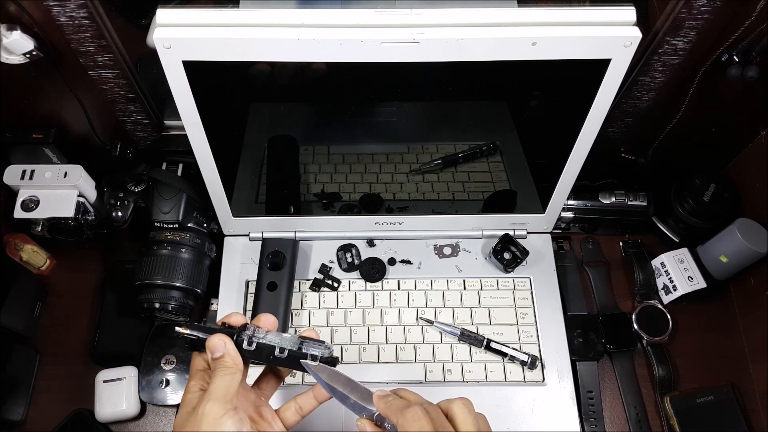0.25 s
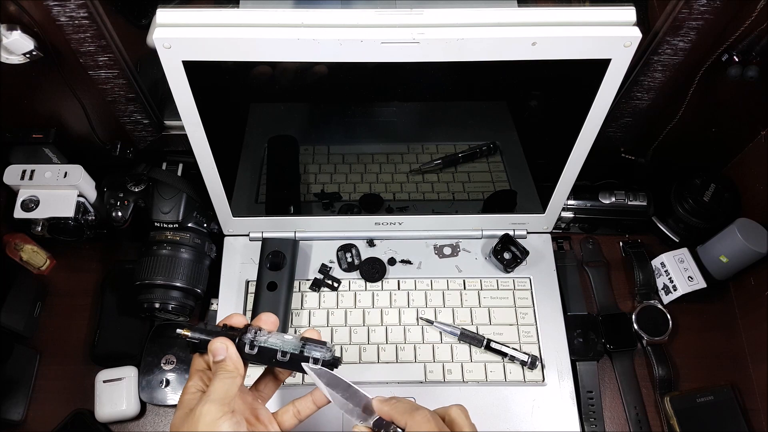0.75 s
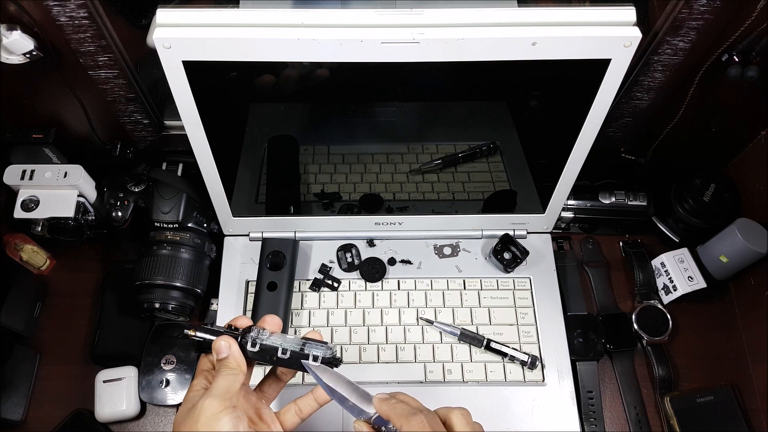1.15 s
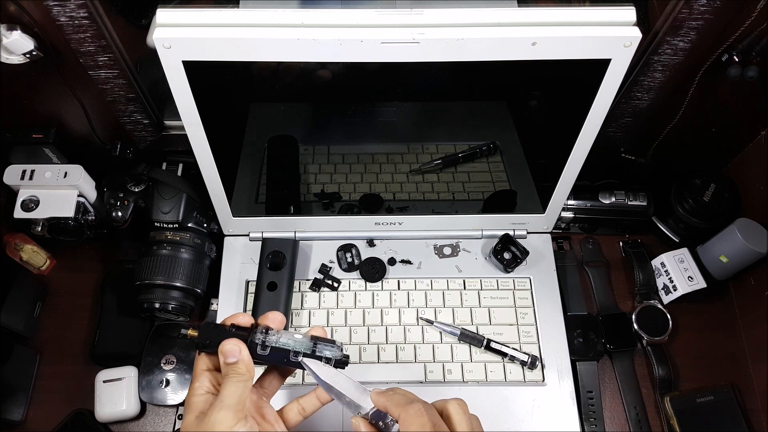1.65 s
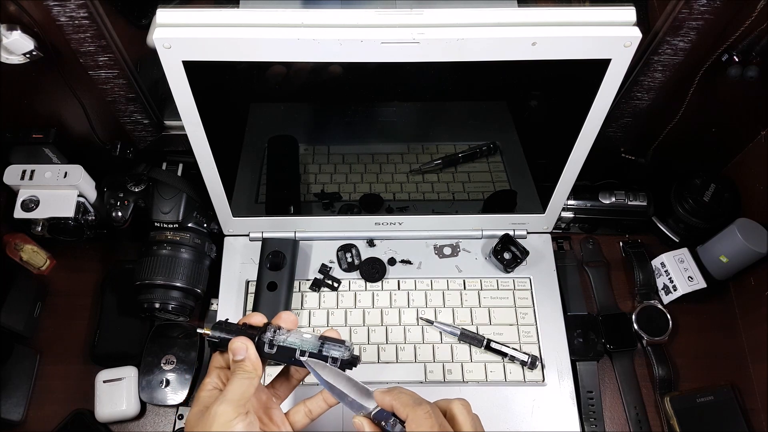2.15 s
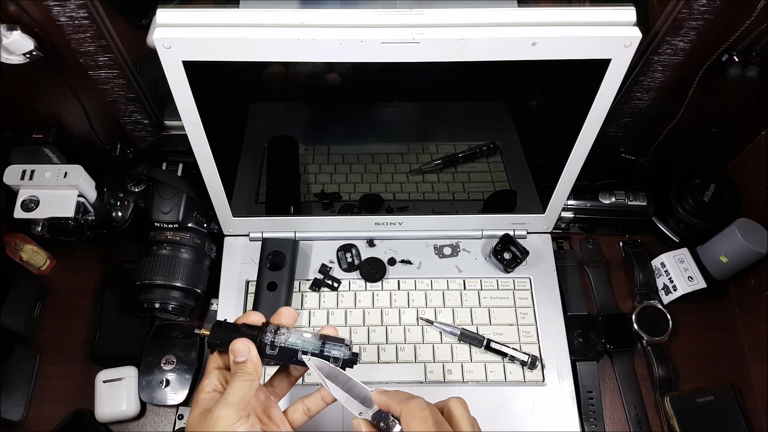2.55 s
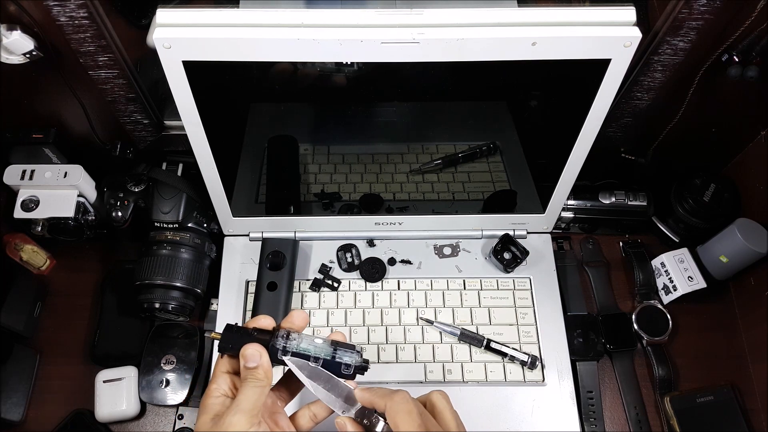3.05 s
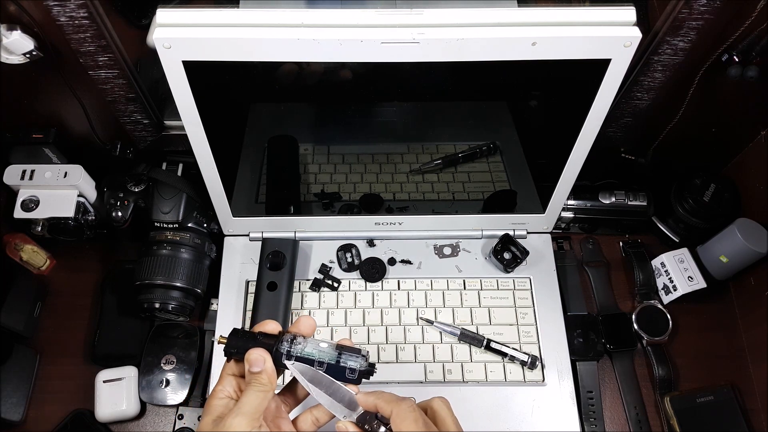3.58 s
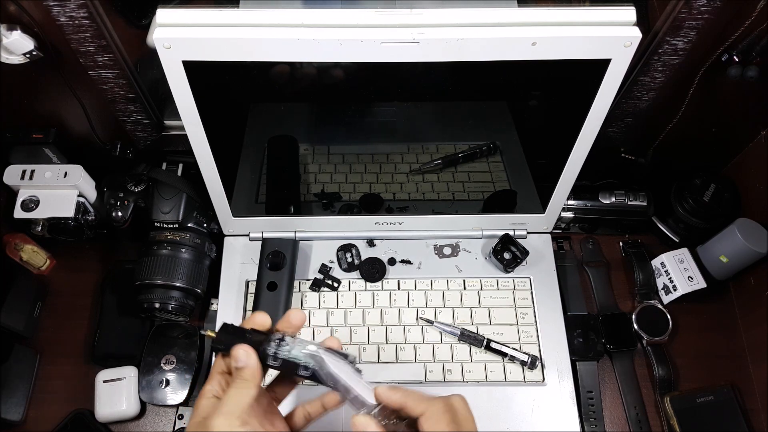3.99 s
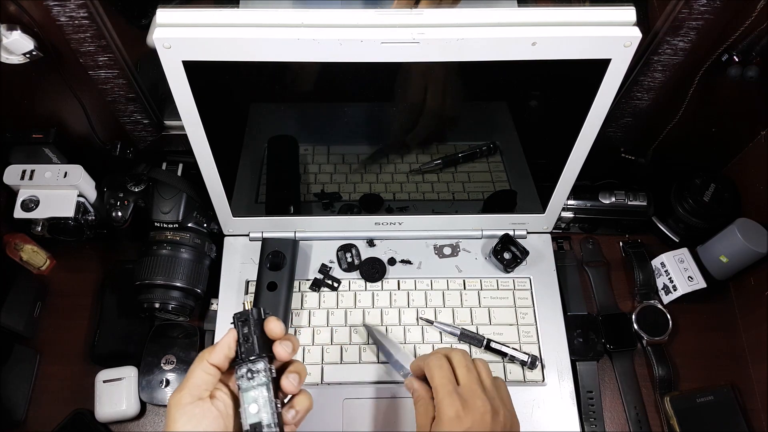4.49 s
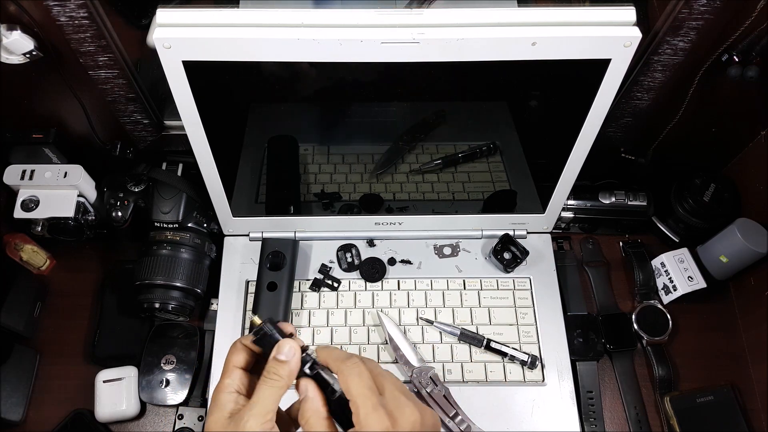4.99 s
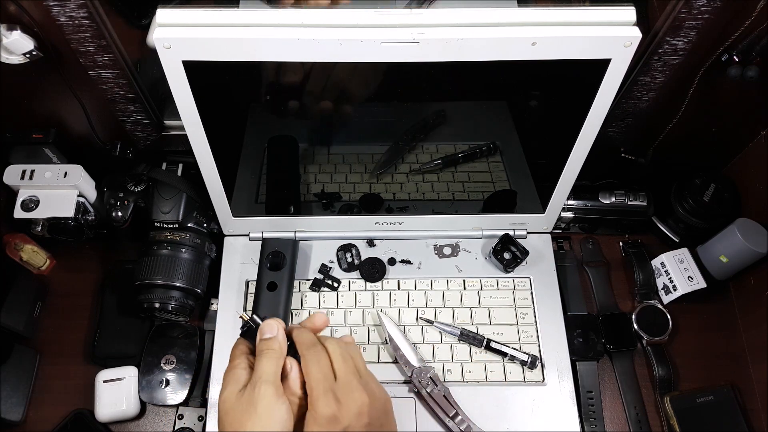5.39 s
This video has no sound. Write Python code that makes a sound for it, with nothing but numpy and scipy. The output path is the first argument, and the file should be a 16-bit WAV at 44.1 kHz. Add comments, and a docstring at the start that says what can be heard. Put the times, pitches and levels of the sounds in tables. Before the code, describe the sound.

A close, dry stereo desk recording of about 5.6 seconds. Soft air, low rumble, mains hum and a faint high motor whine with fine buzz run throughout. At 0.4 s a hard, bright plastic snap cracks out with a brief thump on the left; the recorder's gain dips and creeps back. Small dull picks and short stuttering scrapes follow at 0.6, 0.8, 1.6, 1.9 and a brighter one at 2.2 s. Around 2.65-2.9 s the tip slips and a tight part rings, strongest at 2.8. A tick at 3.2 leads to a tight cluster of snaps near 3.75 s. Fingers rub plastic around 4.0-4.4 s as the trimmer is turned and the air and buzz rise slightly. From 4.45 to 4.65 s the metal tool clatters onto the hollow laptop, hardest at 4.55, with quick bounces. Faint ticks follow, then plastic shells clack at 5.5 and more weakly at 5.6 s.

```python
"""Picking at a trimmer with a steel tool

A pointed tool picks and pries at plastic parts: small ticks, ringing slips and two hard snaps, the first with
a thump on the left microphone. The tool is laid down on a laptop, then plastic parts clack together. Noise
bursts ring the parts, decaying sines ring the laptop, and shaft-locked tones and a repeating scratch make a
small motor whine faintly in a dry room with air, rumble and hum. Loud blows, such as the first snap, make the
recorder turn its gain down; it holds, then creeps back."""
import sys
import numpy as np
from scipy import signal
from scipy.fft import rfft, irfft, next_fast_len
from scipy.io import wavfile
from scipy.ndimage import uniform_filter1d, minimum_filter1d, map_coordinates

SR = 44100
rng = np.random.default_rng(int(sys.argv[2]) if len(sys.argv) > 2 else 0)


def to_wav(sig):
    """Store sig (one row per channel, or 1-D mono) as 16-bit WAV at the path in sys.argv[1].

    Samples outside -1..1 are clipped; the rate is SR.
    """
    pcm = np.clip(np.atleast_2d(sig), -1, 1) * 32767
    pcm = np.round(pcm).astype(np.int16)
    wavfile.write(sys.argv[1], SR, pcm.T)  # frames by channels


N = 248283  # length in samples


def amp(db):
    """Decibels to gain."""
    return 10 ** (np.asarray(db) / 20)


def unit(x):
    """Scale to rms 1."""
    return x / np.sqrt(np.mean(x ** 2) + 1e-20)


def along(points, hz):
    """Read (f/Hz, value) points on a log frequency axis."""
    f, v = np.transpose(points)
    return np.interp(np.log(hz + 1), np.log(f + 1), v)


def curves(rows):
    """Automation: one value per sample for each column after the time."""
    s, *columns = np.transpose(rows)
    return [np.interp(np.arange(N) / SR, s, column) for column in columns]


def wobble(rate):
    """A smooth random curve with this many knots a second."""
    knots = rng.standard_normal(int(N * rate / SR) + 4)
    return map_coordinates(knots, [np.arange(N) * rate / SR])


def filtered(x, response):
    """Filter x with a function of frequency."""
    n = x.shape[-1]
    padded = next_fast_len(n + 8192)
    spectrum = rfft(x, padded) * response(np.fft.rfftfreq(padded, 1 / SR))
    return irfft(spectrum, padded)[..., :n]


def coloured(x, spectrum):
    """x shaped by a spectrum, at rms 1."""
    return unit(filtered(x, lambda hz: amp(along(spectrum, hz))))


def causal(gain):
    """The minimum-phase response with this gain: it rings only after the blow."""
    cepstrum = irfft(np.log(np.maximum(gain, 1e-6)))
    half = len(cepstrum) // 2
    return np.exp(rfft(np.r_[cepstrum[0], 2 * cepstrum[1:half]], len(cepstrum)))


def stereo_noise(size):
    """White noise at two microphones, alike in the bass and unrelated in the treble."""
    # left-right likeness: f/Hz, correlation (0 to 1)
    likeness = [(100, 0.97), (350, 0.45), (800, 0), (1600, 0.11), (16000, 0)]

    def mid_side(hz):
        turn = np.arccos(np.clip(along(likeness, hz), -1, 1)) / 2
        return np.array([np.cos(turn), np.sin(turn)])

    mid, side = filtered(rng.standard_normal((2, size)), mid_side)
    return np.array([mid + side, mid - side])


def add(track, s, sound):
    """Mix a sound into the track at s seconds."""
    part = track[..., round(s * SR):][..., :sound.shape[-1]]
    part += sound[..., :part.shape[-1]]


def burst(envelope):
    """Stereo noise under an envelope, with energy 1 in each channel."""
    x = stereo_noise(size=len(envelope)) * envelope
    return x / np.linalg.norm(x, axis=1, keepdims=True)


def room_tail(t, build_s):
    """The room's answer to one click, scaled to energy 1: each frequency dies at its own speed."""
    # decay of the dry room: f/Hz, t60/s
    decay = [(200, 0.3), (1000, 0.3), (3000, .27), (7000, 0.27), (15000, 0.21)]
    hz, when, z = signal.stft(stereo_noise(size=len(t)), SR, nperseg=256)
    fading = z * amp(-60 * when / along(decay, hz)[:, None])
    tail = signal.istft(fading, SR, nperseg=256)[1][:, :len(t)]
    return unit(tail * (1 - np.exp(-t / build_s))) / np.sqrt(len(t))


def turned(start_s=3.7, length_s=.55):
    """How far the hands have turned the trimmer round, 0 to 1."""
    return np.clip((np.arange(N) / SR - start_s) / length_s, 0, 1)


def background(rumble_db=1, air_db=-63.0, turned_db=2.0, mains_hz=49, mains_db=-6):
    """A soft rush of air, a little louder once the trimmer is turned, over low room rumble and mains hum."""
    # noise colours: f/Hz, relative level/dB per Hz
    rumble_colour = [(15, -34.5), (28, -15.5), (50, 1), (70, -5.5), (102, 1), (145, -3), (197, -18.5),
                     (280, -10), (400, -33), (800, -73.5)]
    air_colour = [(200, -8.5), (290, -1), (400, 1), (700, -3), (1250, -2), (1630, 3.5), (2050, -2.5),
                  (2500, -7.5), (3000, -4.5), (3700, -11.5), (6000, -19), (9500, -15.5), (13000, -12),
                  (16000, -9)]
    # fader for rumble and hum together: t/s, level/dB
    low_fader = [(0, -63), (.55, -61.5), (1.3, -77), (2.45, -75), (2.95, -64), (4.6, -61), (5.3, -63)]

    low_db, = curves(low_fader)
    mains = amp(mains_db) * np.sin(2 * np.pi * mains_hz * np.arange(N) / SR)
    rumble = amp(rumble_db + 0.27 * wobble(34)) * coloured(stereo_noise(size=N), rumble_colour)
    air = coloured(stereo_noise(size=N), air_colour)
    air_level = amp(air_db + turned_db * turned() + 0.4 * wobble(9.9))
    return amp(low_db) * (rumble + mains) + air_level * air


def motor(side_db=-75.0, turned_db=8, buzz_db=-67.5, held_waver=.00008, turned_waver=0.00036, order=27, size=2048):
    """Blade tones on the shaft's multiples, and a fine buzz from the same scratch repeating on every turn."""
    # main whine as the trimmer tilts: t/s, level/dB, left-right/dB
    whine_fader = [(0, -63.5, 8.5), (1.3, -66, 6), (2.6, -69.5, -3.5), (3.4, -69, -7), (4.15, -68.5, -7),
                   (4.7, -61, -7), (5.1, -68, -7), (5.5, -80.5, 4)]
    # quieter tones: shaft order, relative level/dB
    side_tones = [(15, 4.5), (18, -1.5), (21, -1), (23, -6), (24, -1), (29, -13), (31, -7), (33, -11)]
    # buzz colour: f/Hz, relative level/dB per Hz
    buzz_colour = [(2300, -43), (3000, -4), (5000, -9.5), (8000, -14), (10000, -14.5), (12000, -1),
                   (15000, 2.5), (16000, -1.5)]
    start_hz, drift_hz_per_s, sag_hz = 107.7, 0.044, 0.26  # slows a little, and again when turned
    whine_lag, side_lag = .43, .13  # lag at the right microphone (cycles)

    whine_db, left_db = curves(whine_fader)
    shaft_hz = start_hz - drift_hz_per_s * np.arange(N) / SR - sag_hz * turned()
    waver = (held_waver + turned_waver * turned()) * wobble(9.2)
    turns = np.cumsum(shaft_hz * (1 + waver)) / SR

    def tone(k, lag):
        # each microphone's level wavers separately as the hands move
        level = amp(1.5 * np.array([wobble(3.5), wobble(2.4)]))
        cycles = k * turns + rng.random() - np.array([[0], [lag]])
        return level * np.sin(2 * np.pi * cycles)

    one_turn = signal.resample(rng.standard_normal((2, size // 6)), size, axis=1)
    scratch = np.array([np.interp(turns % 1 * size, np.arange(size), channel) for channel in one_turn])
    whine = amp(whine_db + left_db * np.array([[.5], [-.5]])) * unit(tone(order, whine_lag))
    side = unit(sum(amp(db) * tone(k, side_lag) for k, db in side_tones))
    return whine + amp(side_db + turned_db * turned()) * side + amp(buzz_db) * coloured(scratch, buzz_colour)


def rubs():
    """Fingers shift on plastic: skin slides in short, uneven swells."""
    # slides: t/s, length/s, level/dB
    slides = [(2.512, 0.082, -66.5), (3.993, 0.1, -65), (4.22, 0.093, -65), (4.301, 0.15, -56),
              (5.222, 0.056, -63), (5.277, 0.082, -62)]
    # skin noise colour: f/Hz, relative level/dB per Hz
    skin_colour = [(500, -26), (1500, -11), (2300, -3), (3000, 7), (3700, -7.5), (5000, -11), (8000, -26),
                   (16000, -20)]
    t = np.arange(N) / SR
    swell = sum(amp(db) * np.sin(np.pi * np.clip((t - s) / length, 0, 1)) for s, length, db in slides)
    return swell * unit(amp(1.6 * wobble(150)) * coloured(stereo_noise(size=N), skin_colour))


def put_down(count=2, flight_s=.059, shrink=.63, loss_db=3):
    """The tool's landings, then ever quicker and weaker bounces after the hardest one."""
    # landings on the laptop: t/s, click level/dB, brightness/dB per octave, thud level/dB, softness/s
    touches = [(4.443, 2.5, -1.5, -44, .0005), (4.495, -5, 11.5, -16.5, 0.0018),
               (4.524, -0.5, -6, -24, 0.00031), (4.549, 14.5, 2, -11.5, 0.0001),
               (4.571, -8.5, 3.5, -24, 0.00068)]
    # first bounce: click level/dB, brightness/dB per octave, thud level/dB, softness/s
    first_bounce = (0, -4.5, -19, 2)
    drop_s = max(touches, key=lambda row: row[1])[0]
    click_db, bright, thud_db, soft_s = first_bounce
    times = drop_s + np.cumsum(flight_s * shrink ** np.arange(count))
    bounces = [(s, click_db - k * loss_db, bright, thud_db - k * loss_db, soft_s) for k, s in enumerate(times)]
    return list(touches) + bounces


def laptop(room_db=-11, left_db=-0.3, thud_lag_s=0.00436):
    """Bumps ring the hollow case as decaying sines; soft contacts reach mostly its lowest modes."""
    # modes of the case: f/Hz, level/dB, t60/s
    modes = [(54.2, -26.5, 0.51), (119.6, -15, 0.42), (141.4, -11.5, 0.32), (208.4, -13, 0.12),
             (261.7, -7.5, 0.14), (423.4, 2.5, 0.016), (470.5, -0.5, 0.076), (514, -6, 0.086),
             (648, -8.5, 0.051), (795, -29, 0.055)]
    # a hand bumps the laptop: t/s, level/dB, softness/s
    nudges = [(1.521, -59.5, .0002), (4.775, -47.5, 0.0017), (5.597, -36, 0.000089)]

    out, t = np.zeros((2, N)), np.arange(SR // 2) / SR
    # the case answers just after the tool's click
    thuds = [(s + thud_lag_s, db, soft_s) for s, _, _, db, soft_s in put_down()]
    for s, db, soft_s in [*thuds, *nudges]:
        ring = np.zeros(len(t))
        for hz, level, t60 in modes:
            decay = amp(level + rng.normal(0, 2.4) - 60 * t / t60)
            softening = np.hypot(1, 2 * np.pi * hz * soft_s)
            ring += decay / softening * np.sin(2 * np.pi * hz * t)
        ring *= 1 - np.exp(-t / 0.0032)
        echo = signal.fftconvolve(ring[None], room_tail(t, build_s=0.002), axes=1)[:, :len(t)]
        add(out, s, amp(db) * (ring + amp(room_db) * echo))
    return out * amp([[left_db], [-left_db]])


def stutters(events, every_s=.0057, loss_db=2):
    """A dragged contact sticks and slips steadily, each catch weaker: rows of t/s, level/dB, brightness."""
    return [(s + k * every_s, db - k * loss_db, bright)
            for s, db, bright, drag_s in events
            for k in range(1 + round(abs(drag_s) / every_s))]


def clicks(contacts, body, tint, crack_t60, scatter_t60, scatter_db, room_db, rise_s, valley_db, size=16384):
    """Each contact is a brief crack that rings the part, scatters off hands, keys and screen, and fades."""
    # stereo lean of handling: f/Hz, left-right/dB
    stereo_lean = [(200, 1), (600, 1.5), (1000, -0.5), (2500, -1), (5000, -4.5), (8000, -3.5), (12500, 4),
                   (16000, 4.5)]

    out, t, hz = np.zeros((2, N)), np.arange(size) / SR, np.fft.rfftfreq(size, 1 / SR)
    lean = amp(along(stereo_lean, hz) * np.array([[.5], [-.5]]))
    hollow_db, knock_db, snap_db, tick_db = tint
    # valley_db shifts the band between the part's low and high groups of modes
    colour = [(30, hollow_db - 19.5), (150, hollow_db - 3.5), (600, hollow_db), (1500, knock_db),
              (2700, 0.0053), (4000, snap_db / 2), (5400, snap_db + valley_db), (7300, snap_db),
              (9800, (snap_db + tick_db) / 2 - 3), (13000, tick_db + 1.5)]  # f/Hz, level/dB
    treble_octaves = np.log2(np.maximum(hz / 2700, 1))  # brightness tilts the treble
    for s, db, bright in contacts:
        crack = burst(amp(-60 * t / crack_t60) * (1 - np.exp(-t / rise_s)) ** 2)
        scatter = burst(amp(-60 * t / scatter_t60) * (1 - np.exp(-t / 0.0023)))
        blow = amp(-4) * crack + amp(scatter_db) * scatter + amp(room_db) * room_tail(t, build_s=0.0039)
        ring = np.ones(len(hz))
        for f, width, level in body:
            # where the contact lies decides how strongly each resonance answers
            power = amp(level + rng.normal(0, 3.1)) ** 2
            ring += power / (1 + ((hz - f) / (width / 2)) ** 2)
        ring /= uniform_filter1d(ring, size=900)  # resonances gather the energy around them
        gain = amp(db + along(colour, hz) + bright * treble_octaves) * np.sqrt(ring)
        add(out, s, irfft(rfft(blow) * causal(gain) * lean))
    return out


def clacks():
    """Plastic parts pushed together ring their shell."""
    # contacts: t/s, level/dB, brightness/dB per octave, drag/s
    contacts = [(5.5045, 7, 0.5, 0), (5.5115, 9.5, 1, .006), (5.5855, -3, 3, 0), (5.594, 0.5, 1.5, 0.0044)]
    # resonances of the plastic shell and the tool: f/Hz, width/Hz, level/dB
    shell = [(538, 40, 12.5), (600, 30, 18), (940, 49, 2), (1290, 96, 7.5), (1603, 27, 16.5), (2155, 47, 7),
             (2510, 51, 10.5), (2880, 37, 9.5), (3550, 41, 6), (4040, 57, 7), (8250, 390, 9.5)]
    # tint: hollow/dB, knock/dB, snap/dB, tick/dB
    tint = (-6.5, 0.5, -10.5, -15)
    return clicks(stutters(contacts), shell, tint, crack_t60=0.017, scatter_t60=0.0385, scatter_db=-1.5,
                  room_db=-12.5, rise_s=0.00067, valley_db=-1)


def landing_clicks():
    """The tool's handle rings as it lands and bounces on the laptop."""
    # resonances of the handle: f/Hz, width/Hz, level/dB
    handle = [(887, 62, 8.1), (1260, 38, 7.1), (1418, 64, 5.1), (1595, 45, 12), (1740, 70, 5.1),
              (1970, 15, 1.8), (2700, 92, 4.2), (3340, 34, 3.5), (7180, 65, 3)]
    # tint: hollow/dB, knock/dB, snap/dB, tick/dB
    tint = (-0.5, 2.5, -11.5, -15.5)
    contacts = [row[:3] for row in put_down()]
    return clicks(contacts, handle, tint, crack_t60=0.021, scatter_t60=0.074, scatter_db=-5,
                  room_db=-12.0, rise_s=0.00078, valley_db=0.5)


def slips():
    """The tip slips on a tight part, which rings."""
    # contacts: t/s, level/dB, brightness/dB per octave, drag/s
    contacts = [(2.659, -13, 1.5, 0.00086), (2.7998, 2, -0.5, 0.0036), (2.829, -25, 8, 0),
                (2.897, -14, 0.5, 0.0019)]
    # resonances of the tight part: f/Hz, width/Hz, level/dB
    tight_part = [(2440, 200, 21.4), (2710, 62, 5.8), (2895, 69, 18), (3190, 130, 13), (6600, 190, 15),
                  (6930, 290, 10)]
    # tint: hollow/dB, knock/dB, snap/dB, tick/dB
    tint = (-36, -15.5, -10.5, -28)
    return clicks(stutters(contacts), tight_part, tint, crack_t60=0.0097, scatter_t60=0.054, scatter_db=-1,
                  room_db=-12.5, rise_s=0.00067, valley_db=-7.5)


def thump(s=.4103, db=6.6, relax_s=0.0019, rise_s=.00008, cut_hz=40):
    """The first snap jolts the left microphone: one pressure push and its slow rebound."""
    out, t = np.zeros((2, N)), np.arange(SR // 10) / SR
    push = (1 - t / relax_s) * np.exp(-t / relax_s) * (1 - np.exp(-t / rise_s))
    high_pass = signal.butter(1, cut_hz, "high", fs=SR)
    add(out[0], s, -amp(db) * signal.lfilter(*high_pass, push))
    return out


def snaps():
    """Catches let go with a sharp crack, and small parts tick."""
    # contacts: t/s, level/dB, brightness/dB per octave, drag/s
    contacts = [(0.4088, 7.5, 1, 0.000082), (3.735, -12.5, -6, 0.00011), (3.767, -10, -3, 0.0027),
                (3.77, 4, 0, 0.00041), (3.777, 6.5, -2, 0), (4.208, -29.5, -4.5, 0),
                (4.777, -45.5, 3, 0.00093), (4.974, -40.5, 3, .006), (5.07, -37.5, -0.5, 0.0024),
                (5.365, -33.5, 3.5, 0)]
    # resonances of the catch: f/Hz, width/Hz, level/dB
    catch = [(2550, 50, 5), (3550, 430, 8), (4260, 120, 8), (4690, 100, 3.2), (7250, 65, 6.9),
             (8570, 110, 7.3), (7650, 79, 5), (11600, 88, 7), (12800, 150, 7.4), (13600, 67, 4.4)]
    # tint: hollow/dB, knock/dB, snap/dB, tick/dB
    tint = (-9, -9.5, 8, 9)
    return clicks(stutters(contacts), catch, tint, crack_t60=0.0036, scatter_t60=0.042, scatter_db=-1,
                  room_db=-9.5, rise_s=0.00049, valley_db=-7)


def pries():
    """The tip picks and scrapes at the chassis, which rings."""
    # contacts: t/s, level/dB, brightness/dB per octave, drag/s
    contacts = [(0.058, -25.5, -0.5, 0.00005), (0.614, -15, -3.5, 0), (0.779, -2.5, -3, 0),
                (1.285, -31.5, 2.5, 0), (1.579, -9.5, -3, .006), (1.5895, -4, -4, .012),
                (1.8655, -11.5, -4.5, 0), (1.893, -10, 1.5, 0), (1.902, -4, 2.5, 0), (2.1683, 0, 5, .006),
                (2.399, -13, 1, 0), (2.639, -17.5, 0.5, 0), (3.164, -16, 1, 0)]
    # resonances of the chassis: f/Hz, width/Hz, level/dB
    chassis = [(1098, 23, 16), (1490, 140, 13), (1960, 210, 14.5), (2300, 75, -4), (2707, 130, 14),
               (3090, 120, 4.5), (3553, 78, 14.5), (4370, 380, 14.5), (5010, 220, 8.5), (8140, 610, 14),
               (12560, 120, -18)]
    # tint: hollow/dB, knock/dB, snap/dB, tick/dB
    tint = (-21.5, -10.5, -13, -16)
    return clicks(stutters(contacts), chassis, tint, crack_t60=0.016, scatter_t60=0.039, scatter_db=2,
                  room_db=-11.5, rise_s=0.00063, valley_db=2.0)


def scene():
    """Everything on the desk, from the background to the tool."""
    surroundings = background() + motor() + rubs() + laptop()
    return surroundings + clacks() + landing_clicks() + slips() + thump() + snaps() + pries()


def gain_control(x, size=64, ceiling_db=-7, look_ahead_s=.006, hold_s=0.55, recover_db_per_s=13.5):
    """A blow above the ceiling turns the gain down, just ahead of it; it holds, then creeps back."""
    t = np.arange(N) / SR
    power = np.abs(uniform_filter1d(x ** 2, size, axis=1)).max(axis=0)  # the louder channel rules
    level_db = 10 * np.log10(power + 1e-12)
    ahead, hold = round(look_ahead_s * SR), round(hold_s * SR)
    needed_db = np.pad(np.minimum(ceiling_db - level_db, 0), (hold, ahead))
    held_db = minimum_filter1d(needed_db, hold + ahead)[(hold + ahead) // 2:][:N]
    recovery_db = recover_db_per_s * t
    gain_db = np.minimum.accumulate(held_db - recovery_db) + recovery_db
    return x * amp(uniform_filter1d(gain_db, ahead))


def record(dry, top_hz=15800):
    """The recorder rides its gain, clips at full scale and rolls off steeply at its band limit."""
    clipped = np.clip(gain_control(dry), -1, 1)
    return filtered(clipped, lambda hz: np.clip((top_hz - hz) / 200 + .5, 0, 1))


dry = scene()
out = record(dry)
to_wav(out)
```